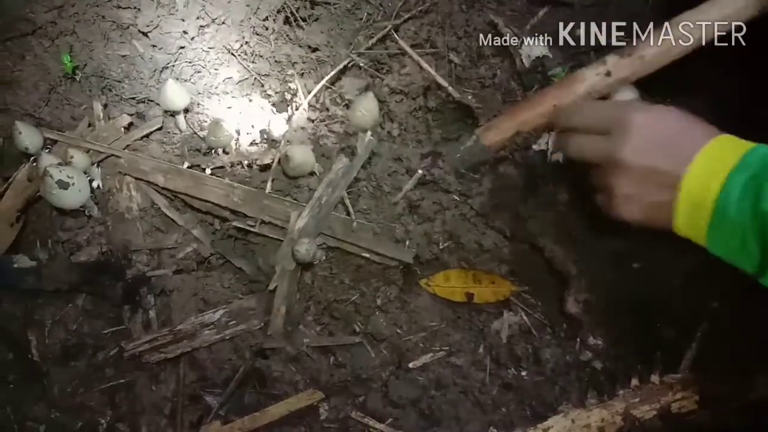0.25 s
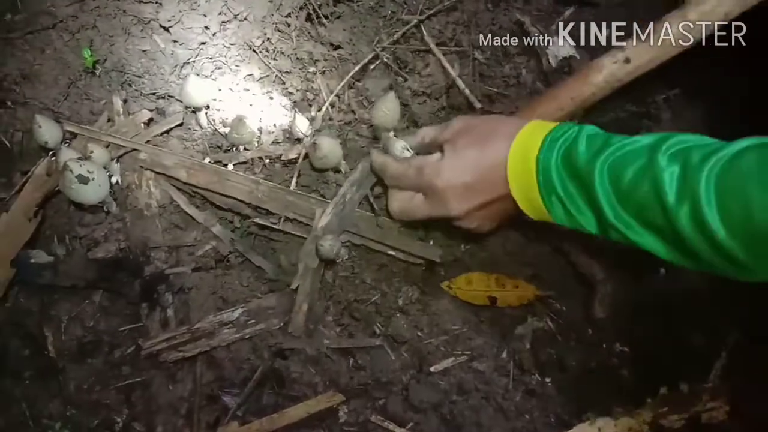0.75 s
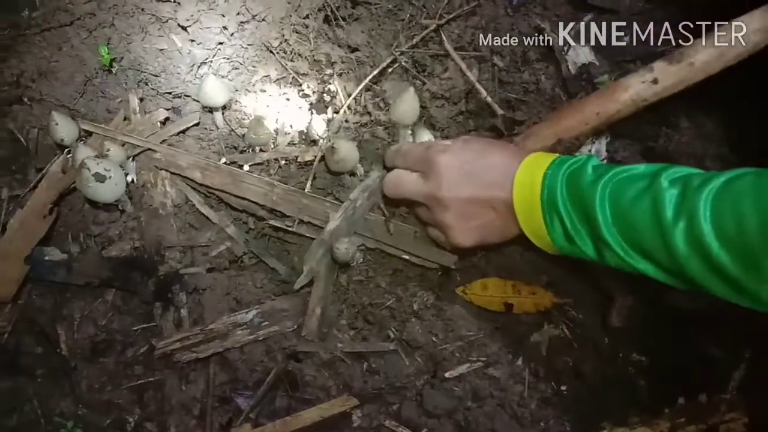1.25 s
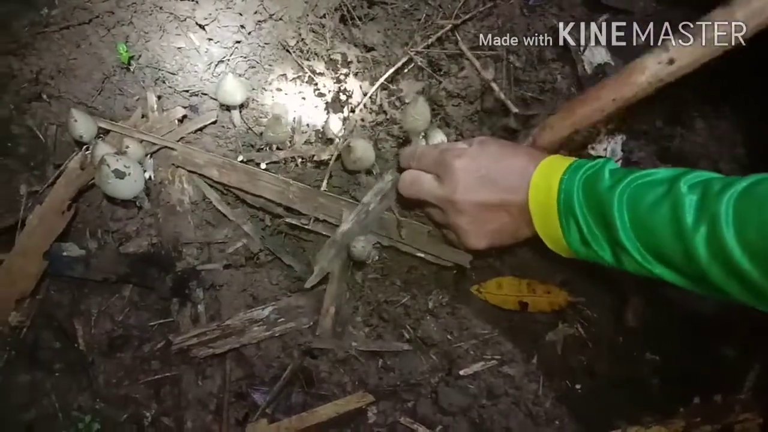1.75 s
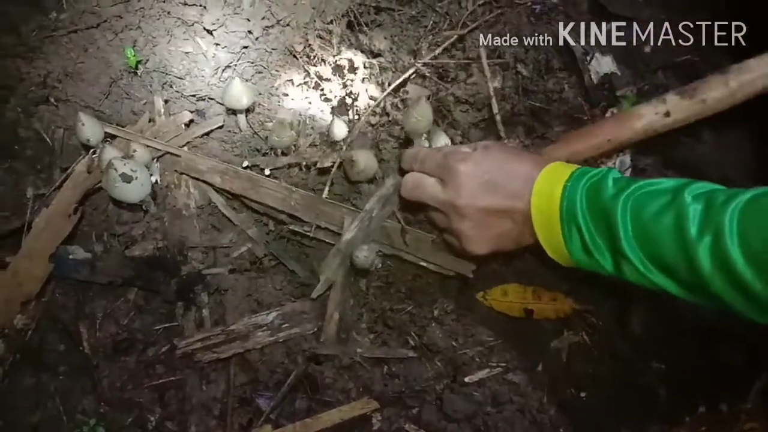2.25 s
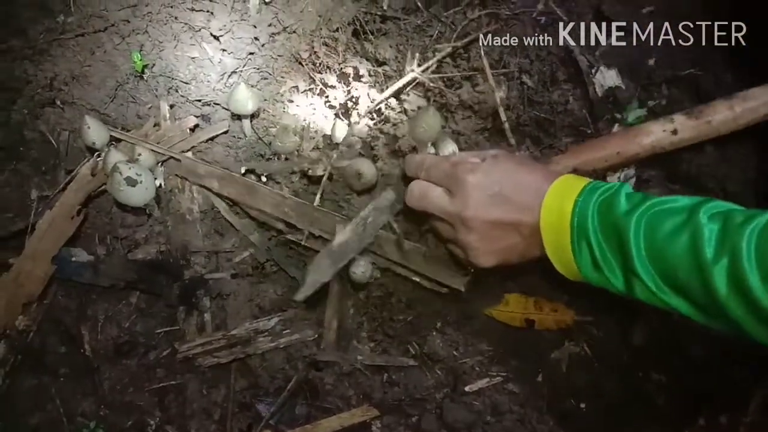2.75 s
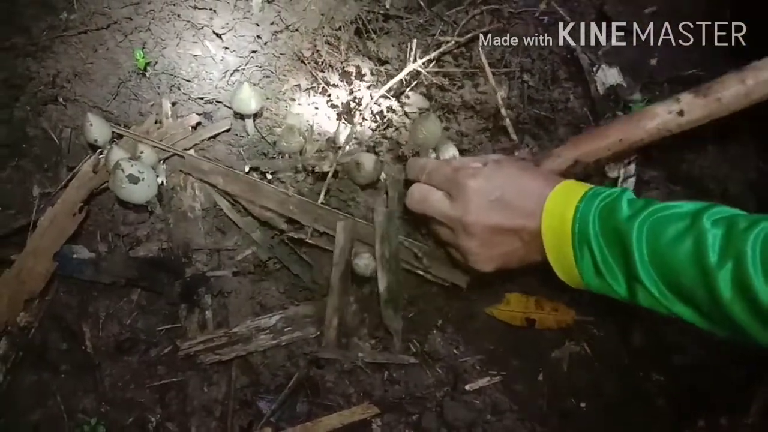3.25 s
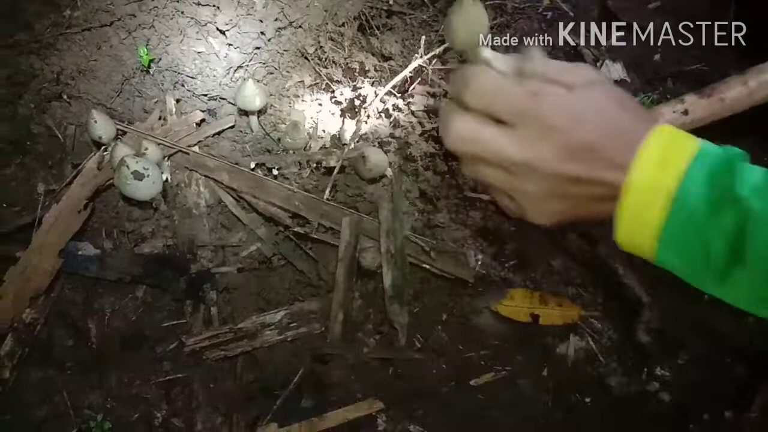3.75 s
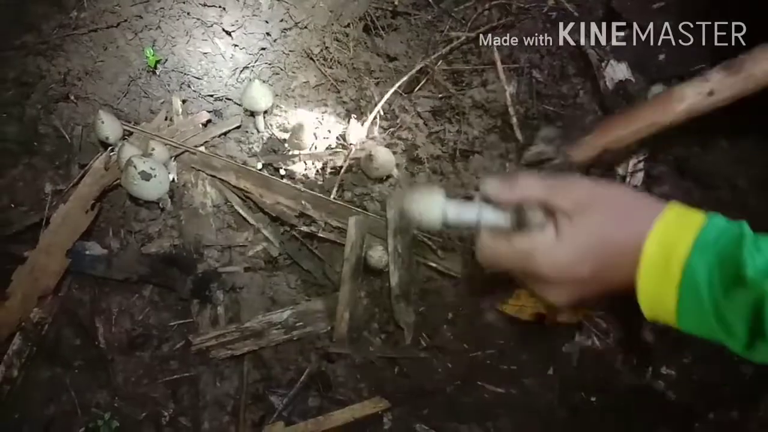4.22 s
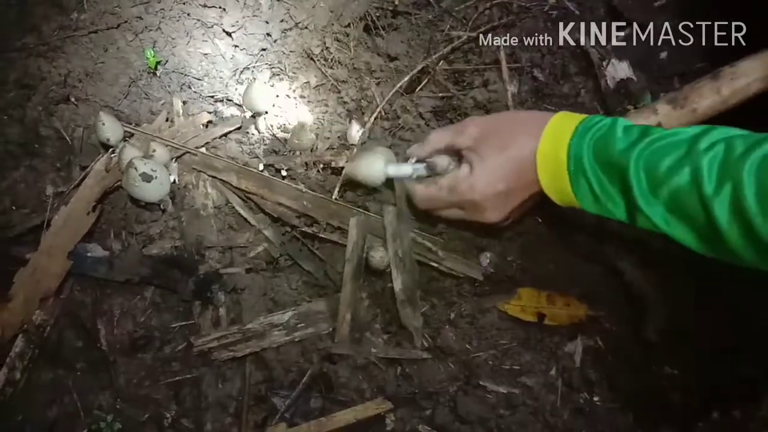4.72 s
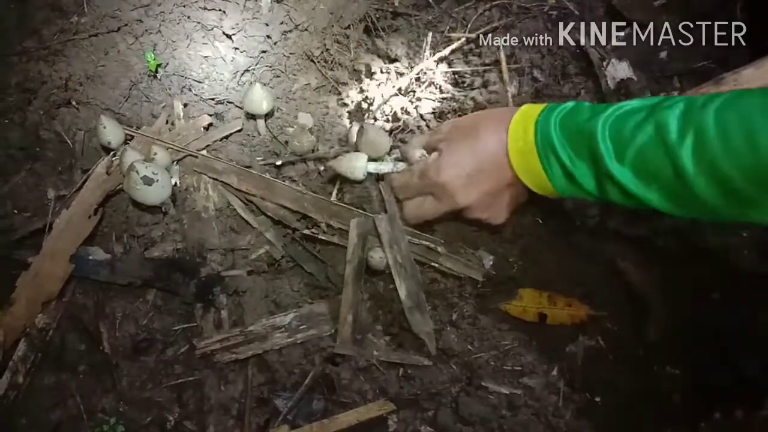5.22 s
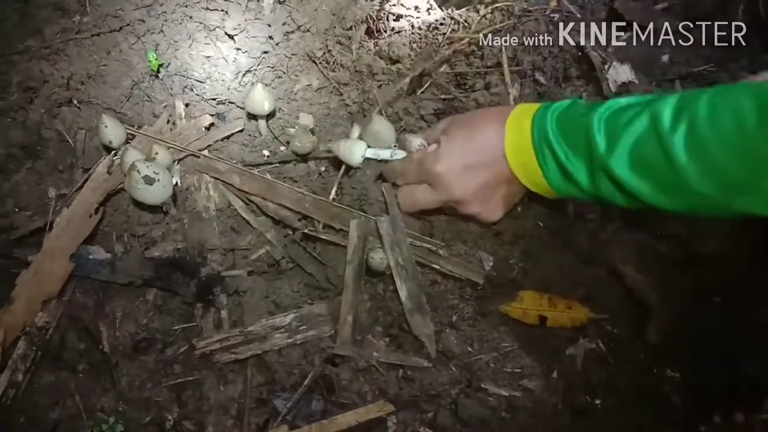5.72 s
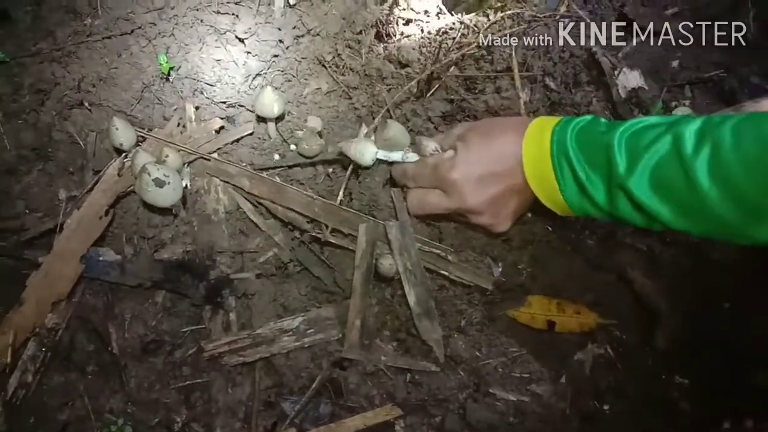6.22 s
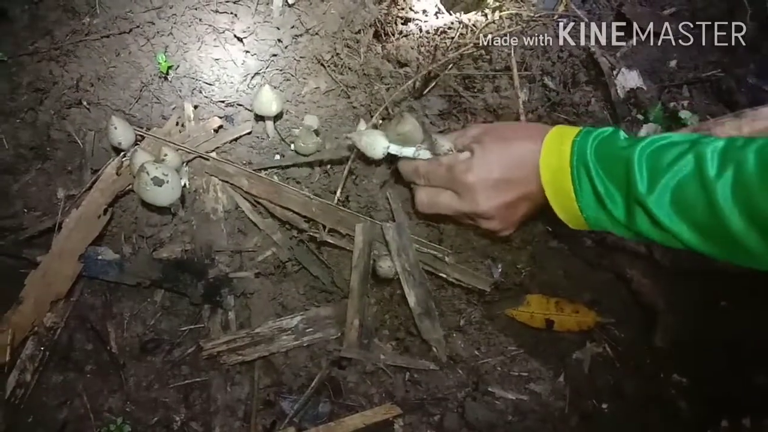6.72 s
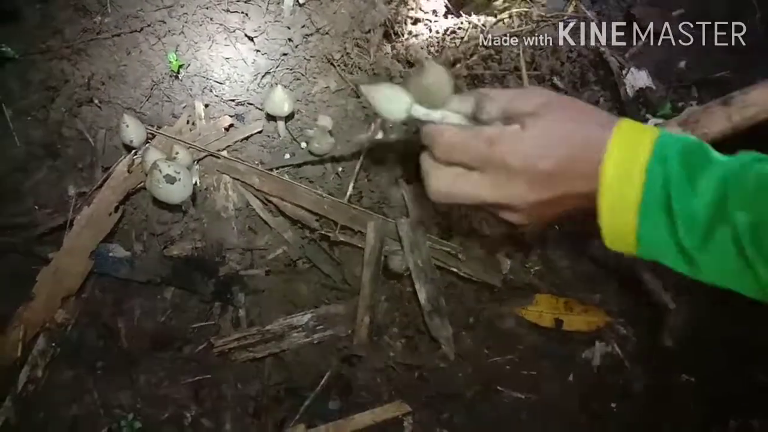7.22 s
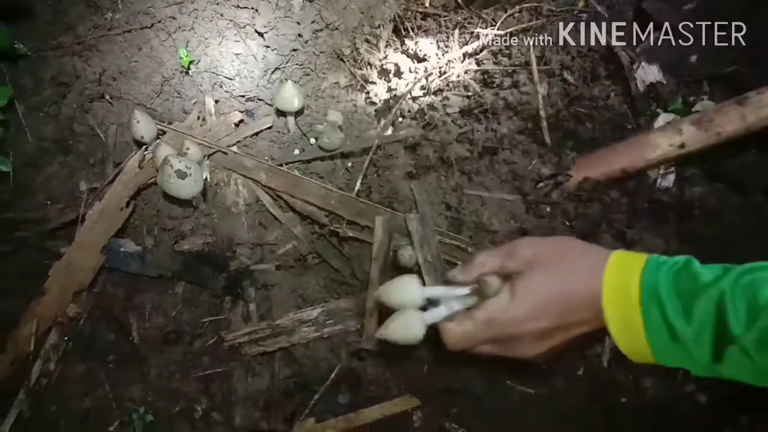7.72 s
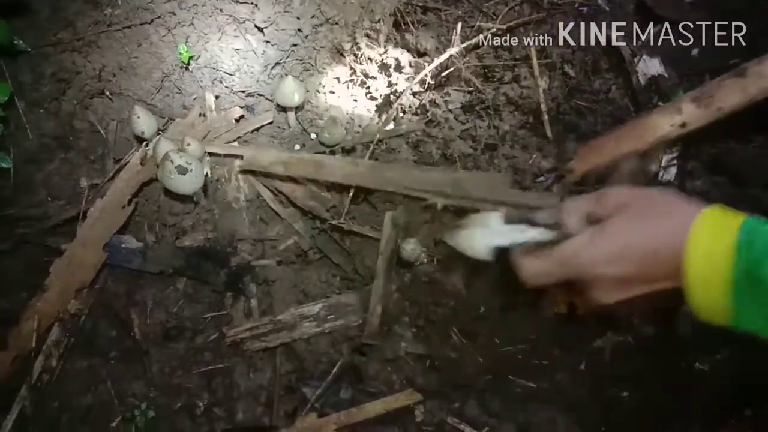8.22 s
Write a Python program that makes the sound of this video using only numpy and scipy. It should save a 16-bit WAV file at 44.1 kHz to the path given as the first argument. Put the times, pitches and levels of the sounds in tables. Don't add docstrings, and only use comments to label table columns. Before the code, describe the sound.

On a forest floor at night, a hand moves sticks, bark and soil close to a phone microphone. Crisp snaps come early, then a hard cluster of cracks around two and a half seconds, followed by sparser taps, soft rustling and a hollow knock late on. Two crickets chirp about four times a second throughout, before blurred choirs of trilling insects, faint night air and hiss.

```python
import sys
import numpy as np
from scipy import signal
from scipy.fft import rfft, irfft
from scipy.io import wavfile
from scipy.ndimage import uniform_filter1d, map_coordinates

SR = 44100
rng = np.random.default_rng(int(sys.argv[2]) if len(sys.argv) > 2 else 0)


def wav_out(sig):
    wavfile.write(sys.argv[1], SR, np.round(np.clip(np.atleast_2d(sig).T, -1, 1) * 32767).astype(np.int16))


def undo_db(level):
    steps = np.asarray(level, float) / 20
    return 10 ** steps


N = 373527
T = np.arange(N) / SR


def rms(x):
    return np.sqrt(np.mean(x ** 2))


def band(x, hz, width_hz, order=2):
    edges = [max(hz - width_hz / 2, 30), min(hz + width_hz / 2, SR / 2.2)]
    return signal.sosfilt(signal.butter(order, edges, "bandpass", fs=SR, output="sos"), x)


def walk(rate, db=None):
    knots = rng.standard_normal(300)
    coarse_t = T[::64]
    path = map_coordinates(knots, [coarse_t * rate], order=3)
    path = (path - path.mean()) / path.std()
    return np.interp(T, coarse_t, path if db is None else undo_db(db * path))


def add(out, s, sound):
    i = max(int(s * SR), 0)
    out[i:i + len(sound)] += sound[:max(N - i, 0)]


def coloured(points):
    hz, db = np.transpose(points)
    f = np.arange(N // 2 + 1) * SR / N + 1
    shape = undo_db(np.interp(np.log(f), np.log(hz), db))
    return irfft(rfft(rng.standard_normal(N)) * shape, N)


def forest(x, wet_db, t60=1):
    t = T[:SR]
    fade = np.exp(-np.log(1000) * t / t60)
    tail = rng.standard_normal(SR) * fade * np.minimum(t / 0.0069, 1)
    tail /= np.sqrt(np.sum(tail ** 2))
    return x + undo_db(wet_db) * signal.fftconvolve(x, tail)[:N]


# (time [s], crack peak [dB], woody middle [dB], fine spit [dB])
CRACKS = [(0.0175, -39, -47, -58), (0.0267, -36.5, -47.5, -45), (0.328, -45, -59, -64),
          (0.1305, -62, -43, -62), (0.144, -29.5, -54, -44.5), (0.1879, -22, -28, -33),
          (0.53, -38, -66, -72), (0.0888, -48, -58, -56), (0.7106, -53, -58, -54), (0.865, -43, -56, -74),
          (0.871, -47, -62, -74), (0.901, -44, -65, -62), (1.0213, -27, -34.5, -38),
          (2.1683, -31.5, -46, -56), (2.1547, -41, -59, -61), (2.187, -55, -60, -62),
          (2.4904, -15, -31, -38), (2.4993, -28, -42, -46), (2.5, -26, -40, -50),
          (2.5085, -10.5, -24.5, -26), (2.5099, -30, -31, -34), (2.5126, -21, -39, -46),
          (2.5413, -46, -59, -50), (2.748, -38, -34, -55), (2.545, -30, -46, -46), (2.6165, -32, -56, -30),
          (2.6235, -40, -61, -41), (2.6258, -31, -57, -31), (2.6492, -21.5, -46, -44),
          (2.648, -26, -41.5, -31), (2.7516, -24.5, -44, -50), (2.991, -48, -54, -60),
          (3.088, -38.5, -73, -74), (3.211, -46, -60, -66), (3.438, -33, -40.5, -40),
          (3.893, -47, -60, -72), (5.9627, -46, -60, -63), (6.0608, -47.5, -50, -68),
          (7.6444, -42, -58, -67), (7.65, -42, -59, -68), (7.6705, -39, -45, -60), (7.6927, -48, -60, -72),
          (7.9224, -51, -64, -69), (7.9352, -36.5, -38.5, -51), (8.269, -41, -59, -70),
          (8.273, -37, -60, -68), (8.4405, -53, -51, -74), (7.9393, -36, -43.5, -60)]
# (time [s], woody peak [dB], ring [Hz])
TAPS = [(0.075, -53, 2790), (0.1436, -35, 2650), (0.257, -50, 3680), (0.2606, -46.5, 2620),
        (0.2935, -42.5, 2300), (0.326, -53, 2200), (0.9269, -41, 3350), (2.0478, -62, 2630),
        (2.156, -54, 2500), (2.366, -51, 5600), (2.570, -54, 2170), (2.596, -55, 2100), (2.071, -54, 3020),
        (6.569, -47, 2580), (6.892, -56, 2710), (3.427, -54, 2940), (4.0327, -51, 3100), (4.376, -58, 3150),
        (7.6918, -43, 5600), (7.6678, -42, 5450), (7.974, -57, 2580), (8.315, -51, 2600),
        (8.333, -49, 2400), (8.44, -47.5, 2200), (5.8636, -49, 2210), (6.06, -50.5, 3140),
        (7.6574, -51, 3630), (8.1076, -49.5, 2280)]
# (time [s], knock peak [dB], ring [Hz], woody middle [dB])
KNOCKS = [(0.292, -44.5, 1780, -63), (0.709, -61, 1290, -65), (1.785, -50.5, 880, -64),
          (2.22, -53, 1230, -64), (2.247, -47, 1220, -58), (2.91, -60.5, 1250, -64),
          (0.865, -62.5, 1300, -67), (1.031, -53, 1110, -64), (1.075, -56.5, 1200, -72),
          (3.21, -44, 1250, -63), (3.465, -54, 1500, -66), (4.155, -53, 1000, -68), (5.131, -53, 1270, -70),
          (2.048, -59, 1250, -64), (2.178, -57.5, 720, -66), (4.479, -51.5, 1280, -74),
          (6.242, -43, 1220, -56), (6.569, -52, 900, -60), (7.923, -57, 1020, -66), (6.307, -60, 1330, -59),
          (6.538, -56, 1300, -64), (6.563, -60, 1230, -62), (6.596, -56, 1270, -51.5),
          (6.704, -52, 1310, -66), (7.3638, -55, 1180, -55), (7.367, -47.5, 1230, -49.5),
          (6.601, -49, 1270, -66), (7.4394, -29, 1310, -41.5), (8.322, -47, 1250, -55),
          (8.433, -52.5, 1470, -59)]
# knock, crack and spit of a tap, against its woody middle [dB]
TAP_PARTS_DB = (-20.5, -15, -22)
KNOCK_PARTS_DB = (-10, -39)


def blows():
    rows = []
    for s, crack, wood, spit in CRACKS:
        rows.append((s, (wood, wood - 26.5, crack, spit), None))
    for s, wood, hz in TAPS:
        rows.append((s, (wood, *np.add(wood, TAP_PARTS_DB)), (0, hz, 0.6)))
    for s, knock, hz, wood in KNOCKS:
        wood_peak = wood + 10.5
        rows.append((s, (wood_peak, knock, *np.add(wood_peak, KNOCK_PARTS_DB)), (1, hz, 1)))
    return rows


# (centre [Hz], width [Hz], time to fade by 60 dB [ms])
SNAP_BANDS = [
    (3600, 1900, 11),
    (1300, 800, 22),
    (6900, 3000, 10),
    (15200, 1700, 9),
]
SPLINTER_DB = (-18, -13, -17, -11)


def snaps():
    out, t, rows = np.zeros(N), T[:1500], blows()
    for (s, levels, ring), noise in zip(rows, rng.standard_normal((len(rows), len(t)))):
        breaks = 1. * (t == 0)
        bounce_s = .3 / 1000 * (1 + abs(noise[-1]))
        breaks[int(SR * bounce_s)] = undo_db(-5)
        part_gains_db = [7.8, 4.9, 1.1, 4.8]
        for part, ((hz, width_hz, t60_ms), db, gain_db) in enumerate(zip(SNAP_BANDS, levels, part_gains_db)):
            if ring and ring[0] == part:
                hz, width_hz = ring[1], width_hz * ring[2]
            fade = np.exp(-np.log(1000) * t / (t60_ms / 1000))
            splinters = undo_db(SPLINTER_DB[part]) * noise * fade
            hit = band(splinters + breaks, hz, width_hz, order=3)
            add(out, s, undo_db(db + gain_db) * hit / np.max(np.abs(hit)))
    thud = band(np.abs(band(out, 810, 2130)), 490, 560, order=1)
    return out + undo_db(-9.0) * thud


# (time [s], length [s], dull rustle [dB], dry rustle [dB], leafy hiss [dB])
RUSTLE = [(0, 0.51, -80, -66, -69), (0.681, 0.074, -71, -75, -61), (0.874, 0.22, -70.5, -63, -77),
          (1.75, 0.19, -67.5, -86, -78), (1.957, 0.39, -67.5, -62.5, -64), (2.52, 0.4, -73.5, -60, -59.5),
          (2.956, 0.091, -69.5, -86, -58), (3.186, 0.081, -61.5, -85, -60.5),
          (4.374, 0.14, -66, -53, -61.5), (4.636, 0.31, -72, -70, -66), (5.075, 0.64, -69.5, -67.5, -78),
          (6.295, 0.11, -86, -71.5, -82), (6.516, 0.14, -63, -56, -78), (6.847, 0.16, -67, -62.5, -70),
          (7.363, 0.016, -61, -57, -46), (6.983, 0.48, -70, -72.5, -67), (7.639, 0.034, -85, -60.5, -45),
          (7.723, 0.056, -92, -61.5, -64), (7.887, 0.15, -64.5, -63, -62), (8.023, 0.41, -68, -66, -63.5),
          (8.237, 0.44, -69.5, -77, -66.5)]


def rustle(per_s=2200., scatter_db=3.):
    out, t = np.zeros(N), T[:300]
    sizes = (rng.random(N) < per_s / SR) * undo_db(scatter_db * np.minimum(rng.exponential(size=N), 4))
    grains = signal.fftconvolve(sizes, np.exp(-t / .0012) + .003)[:N]
    for part, (hz, width_hz) in enumerate([(1500, 1970), (3000, 1660), (6200, 2130)]):
        force = np.zeros(N)
        for s, length, *db in RUSTLE:
            add(force, s, undo_db(db[part]) * np.hanning(int(length * SR)) ** .5)
        crumbs = band(grains * rng.standard_normal(N), hz, width_hz)
        out += force * undo_db(3 * walk(25)) * crumbs / rms(crumbs)
    return out


# (ring [Hz], width [Hz], level [dB])
CAVITY = (1260, 90, -6)


def hand():
    close = snaps() + rustle()
    hz, width_hz, db = CAVITY
    hollow = undo_db(db) * 4 * band(close, hz, width_hz, order=1)
    return forest(close + hollow, -33, t60=.05)


def stroke(hz, fall_hz, ms, turn):
    u = np.linspace(0, 1, int(ms * SR / 1000))
    pitch = hz + fall_hz * (.5 - u ** 1.235)
    swell = np.sqrt(2) * np.sin(np.pi * u) ** 0.36
    return swell * np.sin(2 * np.pi * (np.cumsum(pitch) / SR + turn))


# (time of last stroke [s], level [dB])
CHIRPS = [(0.124, -50), (0.356, -49.5), (0.586, -49), (0.834, -49.5), (1.09, -46.5), (1.315, -49),
          (1.559, -53), (1.838, -51), (2.065, -51), (2.322, -49.5), (2.549, -72), (2.781, -50.5),
          (3.011, -50), (3.266, -48.5), (3.498, -50.5), (3.751, -50), (3.979, -51.5), (4.233, -49.5),
          (4.488, -46.5), (4.715, -51), (4.966, -51.5), (5.22, -50), (5.446, -50.5), (5.702, -52),
          (5.93, -53), (6.17, -58), (6.422, -52.5), (6.671, -53), (6.927, -51.5), (7.156, -52.5)]
# (time of last stroke [s], level [dB])
ANSWERS = [(.16, -61), (.385, -60), (.615, -67), (.86, -56), (1.115, -56), (1.34, -51.5), (1.59, -51.5),
           (1.87, -52.5), (2.12, -78), (2.39, -57.5), (2.61, -53.5), (2.85, -52), (3.085, -50.5),
           (3.31, -56.5), (3.55, -53.5), (3.80, -55.5), (4.03, -57), (4.27, -52), (4.51, -55),
           (4.77, -54.5), (5.03, -64), (5.26, -56.5), (5.49, -53), (5.75, -54.5), (5.98, -51.5),
           (6.22, -51), (6.51, -53.5), (6.73, -54), (7.0, -54.5), (7.24, -55), (7.48, -54), (7.72, -54),
           (7.97, -53.5), (8.2, -54.5), (8.44, -52)]


def cricket(chirps, hz, fall_hz, wet_db, ms=18, period_ms=25.1, warmup_db=-14.0):
    out, chance = np.zeros(N), rng.standard_normal((len(chirps), 7, 2))
    for (last, db), luck in zip(chirps, chance):
        lead_db = db - 5 + luck[6, 0]
        for k, level_db in enumerate([db, db, db, db, lead_db, lead_db + warmup_db]):
            gain = undo_db(level_db + 2.5 + 1.1 * luck[k, 0])
            start = last - (k * period_ms + ms / 2) / 1000
            if start > 0:
                add(out, start, gain * stroke(hz, fall_hz, ms, luck[k, 1]))
    return forest(out, wet_db, t60=.4)


# (pitch [Hz], rate [strokes per s], level [dB], strokes, list of start times [s])
TRILLS = [(8180, 67, -68, 8, [.170, .508, .903, 2.341, 2.697, 3.090, 4.421, 4.781, 5.190, 6.674, 7.060, 7.441]),
          (8460, 67, -72, 7, [.014, 1.708, 3.20, 3.503, 3.772, 4.065, 4.447, 4.910, 5.161, 5.415, 5.690, 6.546, 6.830, 7.094, 7.385, 7.688]),
          (5400, 70, -64, 7, [.945, 1.41, 1.63])]
# (pitch [Hz], rate [strokes per s], level [dB], list of (start time [s], strokes))
RUNS = [(8550, 98, -72, [(.84, 26), (1.11, 38), (1.5, 28), (6.12, 7)]), (7580, 36.6, -68, [(2.338, 5),
        (2.672, 9), (3.291, 23), (4.283, 27), (5.467, 24)])]
# (time of first stroke [s], level [dB])
PAIRS = [(2.408, -62), (2.558, -62), (2.668, -68), (2.880, -65), (3.183, -70), (3.487, -59), (6.603, -68),
         (6.863, -66), (7.099, -63), (7.477, -63), (7.985, -57)]
# (time [s], peak [dB])
TICKS = [(3.607, -46), (3.9469, -47), (4.2747, -46), (4.665, -44), (5.0828, -46), (5.5273, -48.5),
         (6.6488, -54), (7.4984, -47)]


def soloists(share=.76):
    out = np.zeros(N)
    even = [(hz, rate, db, [(s, strokes) for s in starts]) for hz, rate, db, strokes, starts in TRILLS]
    for hz, rate, db, calls in even + RUNS:
        ms = 1000 * share / rate
        for (s, strokes), luck in zip(calls, rng.standard_normal((len(calls), 42, 2))):
            for k in range(min(round(strokes), 40)):
                flat = .025 * np.exp(-k / 1.5) if strokes > 8 else 0
                pitch = hz * (1 + 0.003 * luck[41, 0] + 0.004 * luck[k, 1] - flat)
                sound = stroke(pitch, 0.012 * hz, ms, luck[k, 1])
                start = s + (k + 0.07 * luck[k - 1, 1]) / rate - ms / 2000
                add(out, start, undo_db(db - 1.0 + 3.2 * luck[k, 0]) * sound)
    for s, db in PAIRS:
        for late_s in (0, .047):
            add(out, s + late_s, undo_db(db) * stroke(5580, 300, 13, 0))
    for s, db in TICKS:
        add(out, s, undo_db(db - 14.5) * stroke(8560, 250, 5.3, 0))
    return forest(out, -3.5, t60=.6)


def choir(hz, spread_hz, fall_hz, rate, share=.6, count=4):
    out = np.zeros(N)
    for place, luck in zip(np.linspace(-1, 1, count), rng.standard_normal(count)):
        u = np.minimum(T * rate * (1 + .08 * luck) % 1 / share, 1)
        pitch = hz + spread_hz * (place + .5 * walk(2)) + fall_hz * (.5 - u)
        out += walk(5.6, 2.2) * np.sin(np.pi * u) * np.sin(2 * np.pi * np.cumsum(pitch) / SR)
    out = forest(out, 7.5)
    return out / np.sqrt(uniform_filter1d(out ** 2, size=SR // 4) + 0.014 * np.mean(out ** 2))


def phrases(rows, attack_s, release_s, rest_db):
    gain = undo_db(rest_db)
    for s, hold_s, db in rows:
        corners = np.cumsum([0, attack_s, hold_s, release_s])
        gain = gain + undo_db(db) * np.interp(T - s, corners, [0, 1, 1, 0]) ** 2
    return gain


# (pitch [Hz], spread between singers [Hz], fall in a stroke [Hz], rate [strokes per s])
VOICES = [
    (5150, 35, 70, 62),
    (1260, 40, 70, 30),
    (2260, 100, 130, 25),
    (4200, 95, 250, 39),
    (6880, 150, 200, 80),
    (6320, 80, 120, 55),
    (3400, 70, 80, 40),
    (5600, 80, 120, 50),
    (3850, 60, 100, 40),
    (10450, 300, 700, 140),
]
STEADY_DB = [-73, -55.5, -60, -72.5, -75.5, -99, -73, -91.5]
# (depth [dB], rate [per s])
WANDER = [(3.5, 7), (1.2, 2), (1.5, 1.5)] + 5 * [(3, 4)]
# (time [s], level [dB])
PULSES = [(-.3, -56.5), (.76, -58.5), (1.739, -57.5), (2.839, -60.5), (3.758, -60.5), (4.739, -60),
          (5.979, -58), (7.06, -60), (8.042, -56.5)]
# (time [s], hold [s], level [dB])
RING_SWELLS = [(.8, 0.2, -80), (2.0, 0.05, -74), (4.1, 0.1, -70), (6.82, 0.06, -72), (8.3, 0.1, -72),
               (.68, .12, -74), (6.25, .1, -73), (6.6, .06, -72)]


def chorus():
    pulse_rows = [(s, 0.28, db) for s, db in PULSES]
    gains = [phrases(pulse_rows, attack_s=0.092, release_s=0.51, rest_db=-75) * walk(3.7, 0.57),
             phrases(RING_SWELLS, attack_s=0.067, release_s=0.067, rest_db=-76) * walk(9, 4)]
    gains += [undo_db(db) * walk(rate, depth) for db, (depth, rate) in zip(STEADY_DB, WANDER)]
    shimmer = band(rng.standard_normal(N), 15150, 1300, order=3)
    shimmer *= undo_db(1.5 * walk(2) + walk(20)) / rms(shimmer)
    scoop = sum(np.where(T > s, np.exp(-abs(T - s) / .12), 0) for s, _ in PULSES)
    voices = [(VOICES[0][0] - 172.3 * scoop, *VOICES[0][1:])] + VOICES[1:]
    return undo_db(-86) * shimmer + sum(gain * choir(*voice) for voice, gain in zip(voices, gains))


# (frequency [Hz], level [dB per Hz])
AIR = [(40, -30), (68, -8), (150, -7), (420, -21), (1600, -26), (6500, -22), (9800, -40), (13800, -43)]


def air(swell_db=2.2, flicker_db=2.2):
    hiss = coloured(AIR)
    spectrum, octave = rfft(hiss), np.log2(np.arange(N // 2 + 1) * SR / N + 1)
    out = np.zeros(N)
    for centre in np.arange(4, 15, 1 / 2):
        depth = .3 if centre > 13 else 1
        patch = irfft(spectrum * np.maximum(1 - 2 * abs(octave - centre), 0), N)
        out += patch * walk(2.51, depth * swell_db) * walk(14, depth * flicker_db)
    hum = band(rng.standard_normal(N), 73, 11, order=2)
    return undo_db(-64.5) * out / rms(hiss) + undo_db(-72.5) * hum / rms(hum)


# (frequency [Hz], level [dB])
PORTS = [(24, -11), (40, -0.5), (973, -4), (1250, 2.5), (2510, -7.5), (3930, -0.5), (5200, -24),
         (15500, -10.5)]


def port_noise():
    side = coloured(PORTS)
    return undo_db(-79) * side / rms(side)


def scene():
    near, far = cricket(CHIRPS, 4290, 450, -8), cricket(ANSWERS, 4170, 321, -0.6)
    mid = hand() + near + far + soloists() + chorus() + air()
    side = port_noise() + undo_db(-34) * np.roll(mid, 300)
    return mid + np.outer([1, -1], side)


def roll_off(x):
    return signal.sosfilt(signal.butter(12, 16670, fs=SR, output="sos"), x)


# (time [s], depth [dB], recovery [ms])
DIPS = [
    (2.515, -5, 14),
    (2.618, -18, 4),
]


def record(dry):
    top = signal.ellip(7, .15, 20, 15500, fs=SR, output="sos")
    dip_db = sum(np.where(T > s, db * np.exp(-((T - s) * 1000 / ms) ** 2), 0) for s, db, ms in DIPS)
    gain = uniform_filter1d(undo_db(dip_db), size=40)
    mix = signal.sosfiltfilt(top, gain * dry)
    return roll_off(mix)


dry = scene()
out = record(dry)
wav_out(out)
```